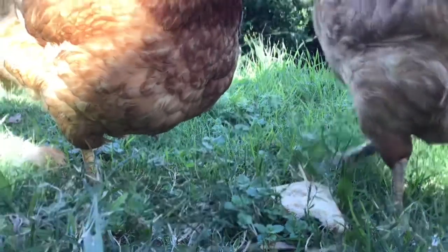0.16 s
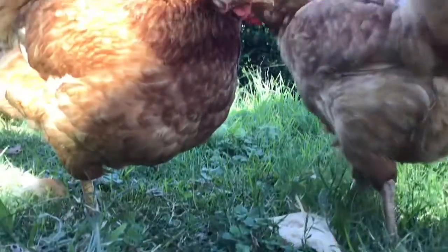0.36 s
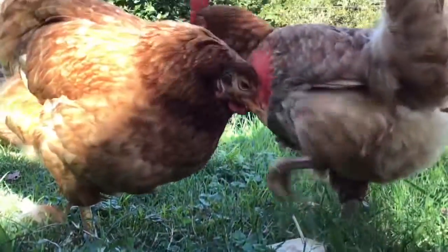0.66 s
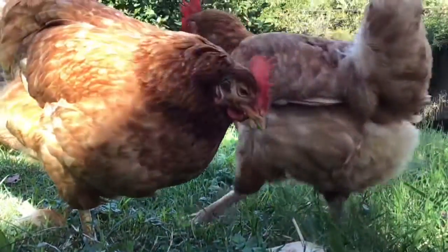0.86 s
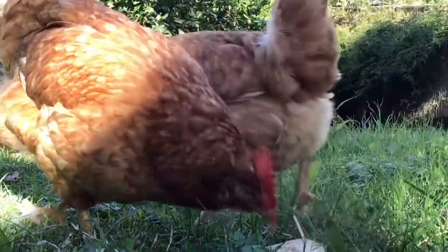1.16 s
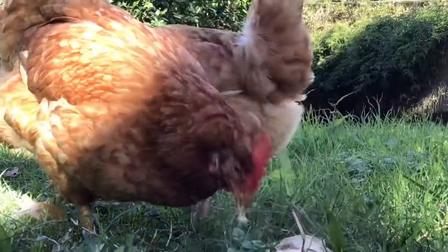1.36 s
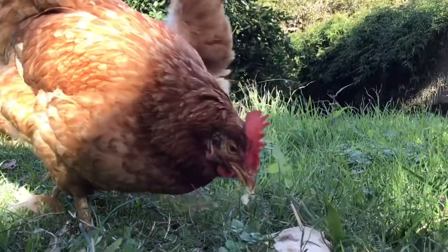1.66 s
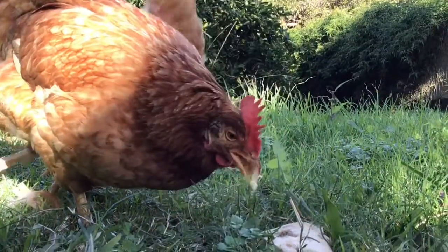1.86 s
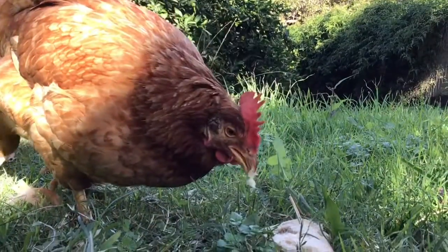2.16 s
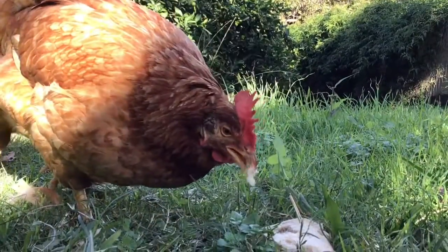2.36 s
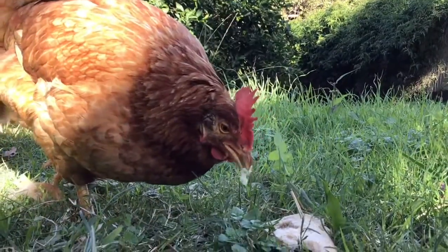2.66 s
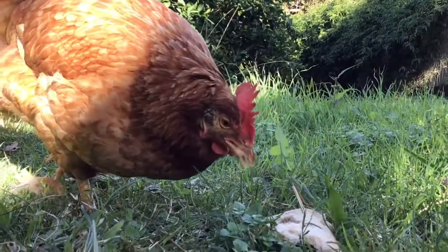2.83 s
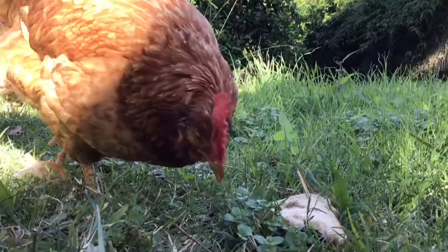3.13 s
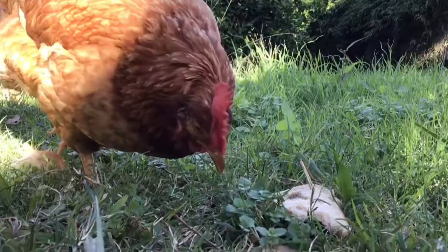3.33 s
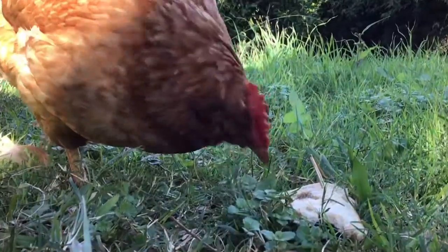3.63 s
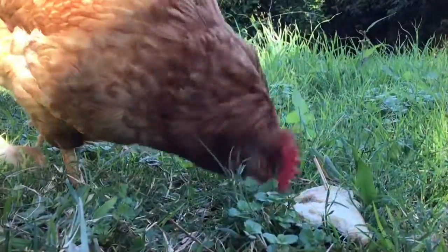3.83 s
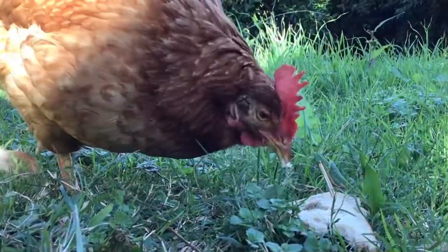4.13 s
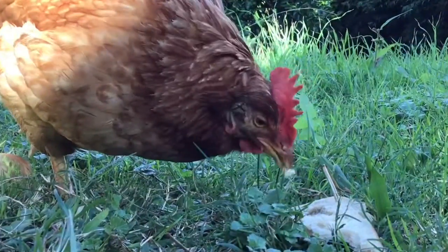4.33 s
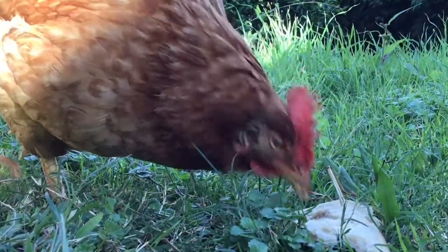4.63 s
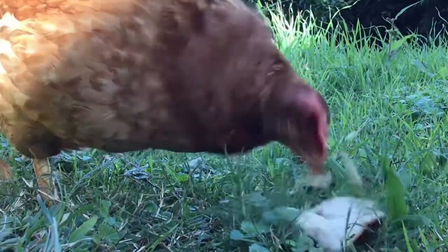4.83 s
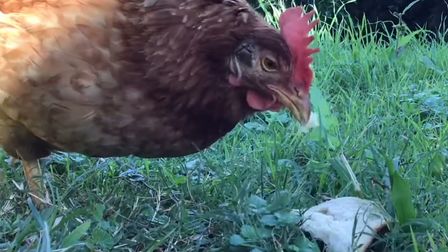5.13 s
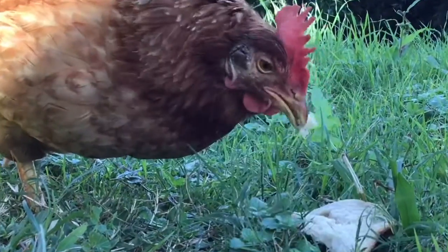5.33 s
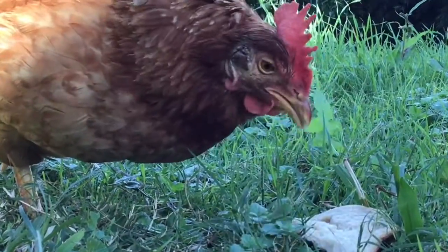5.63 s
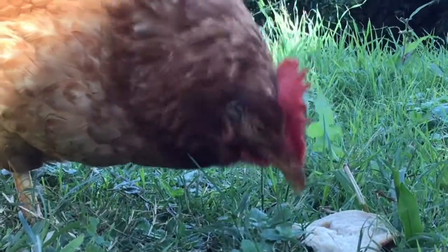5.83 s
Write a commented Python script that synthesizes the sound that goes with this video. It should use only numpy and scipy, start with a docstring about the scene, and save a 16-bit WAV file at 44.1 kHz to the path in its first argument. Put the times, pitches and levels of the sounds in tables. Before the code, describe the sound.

A hand scrapes and loudly knocks the microphone, then hens peck quietly in grass with faint ticks, rustles and distant small birds chirping.

```python
"""A hand slides off the microphone of a recorder held close to hens pecking at bread, and knocks its housing.
Slips of friction make the slide and the later grip creaks; knocks are falling tones, thuds padded swings.
Grass rustles in filtered crackle, and beaks and stalks tick as short ringing bursts.
Small birds chirp in gliding sines with scattered echoes; shaped noise rumbles in the distance."""
import sys
import numpy as np
from scipy import signal
from scipy.fft import rfft, irfft
from scipy.io import wavfile
from scipy.ndimage import uniform_filter1d

SR = 44100
rng = np.random.default_rng(int(sys.argv[2]) if len(sys.argv) > 2 else 0)


def materialize(psi):
    """Save the field psi as 16-bit PCM at rate SR to the path in sys.argv[1].

    A 1-D psi becomes a single channel; in a 2-D psi each row is a channel.
    """
    bounded = np.clip(np.atleast_2d(psi).T, -1, 1)
    quanta = np.round(bounded * 32767).astype(np.int16)
    wavfile.write(sys.argv[1], SR, quanta)


N = 264159


def gain_of(db):
    """Amplitude factor of a level in dB."""
    return 10 ** (np.asarray(db) / 20)


def evened(x):
    """Scales x to rms 1."""
    return x / np.sqrt(np.mean(x ** 2) + 1e-20)


def add(mix, start_s, sound):
    """Adds a sound in place, cut at the end of the mix."""
    part = mix[round(start_s * SR):][:len(sound)]
    part += sound[:len(part)]


def add_each(mix, rows, source):
    """Plays every row of a table: its start, then the settings of the source."""
    for start_s, *settings in rows:
        add(mix, start_s, source(*settings))


def columns(rows):
    """Reads a curve table at every sample; returns the start time and the columns."""
    row_s, *cols = np.transpose(rows)
    t = np.arange(row_s[0], row_s[-1], 1 / SR)
    return row_s[0], [np.interp(t, row_s, col) for col in cols]


def coloured(x, points):
    """Shapes x by a spectrum given on a log-frequency axis, at rms 1."""
    point_hz, point_db = np.transpose(points)
    hz = np.fft.rfftfreq(len(x), 1 / SR)
    db = np.interp(np.log(hz + 1), np.log(point_hz + 1), point_db)
    return evened(irfft(rfft(x) * gain_of(db), len(x)))


def resonate(x, hz, width_hz):
    """Shifts the curve hz down to zero, smooths, and shifts back: a resonance of gain 1."""
    turn = np.exp(2j * np.pi * np.cumsum(hz * np.ones(len(x))) / SR)
    r = np.exp(-np.pi * width_hz / SR)
    return 2 * (turn * signal.lfilter([1 - r], [1, -r], x / turn + 1e-18)).real


def wobble(n, seconds):
    """Slow chance of rms 1: noise averaged twice over the given span."""
    span = max(round(seconds * SR), 2)
    return evened(uniform_filter1d(uniform_filter1d(rng.standard_normal(n), span), span))


def grit(n, per_s, spread_db, hiss):
    """Friction: many tiny slips of uneven size over a smooth hiss."""
    sizes = gain_of(spread_db * np.minimum(rng.exponential(1, n), 4))
    slips = sizes * (rng.random(n) < per_s / SR) * rng.choice([-1., 1.], n)
    return evened(evened(slips) + hiss * rng.standard_normal(n))


# Hand sliding over the microphone. Each row: time in seconds, drag level in dB,
# pitch of the air pocket under the hand in Hz, pocket level in dB.
SLIDE_CURVE = [(0, -33.5, 1500, -79.5), (.03, -34, 1550, -75), (.07, -28.5, 1600, -65.5),
               (.105, -23, 1886, -54), (.14, -24.5, 1981, -52), (.185, -32.5, 2100, -52),
               (.225, -42, 2600, -52), (.25, -53.5, 3522, -55.5), (.33, -67, 5600, -65.5),
               (.4, -70.5, 7600, -71.5), (.5, -72.5, 8800, -78)]
# Spectrum of the drag. Each row: frequency in Hz, relative density in dB per Hz.
SLIDE_SPECTRUM = [(24, -45.5), (40, -10), (97, -14.5), (175, 0), (599, -7), (677, -6), (845, -9.5),
                  (954, -9), (5000, -55), (6500, -86.5), (11000, -120)]


def slide():
    """Skin drags on the housing; the air pocket under the hand rings higher as it opens."""
    start_s, (drag_db, pocket_hz, pocket_db) = columns(SLIDE_CURVE)
    n = len(drag_db)
    drag = coloured(grit(n, 4000, spread_db=4.0, hiss=1.3), SLIDE_SPECTRUM)
    drag *= gain_of(drag_db + 2.4 * wobble(n, 0.0036))
    brush = grit(n, 2000, spread_db=4.0, hiss=0.63)
    under = brush
    for _ in range(5):  # the pocket passes little above its own band
        brush = resonate(brush, pocket_hz, 3700)
        under = resonate(under, .6 * pocket_hz, 5200)  # duller brushing below it
    pocket = evened(brush) + 1.2 * evened(under)
    return start_s, drag + pocket * gain_of(pocket_db + 2.1 * wobble(n, 0.0068))


# Blows on the housing. Each row: start in seconds, peak in dB, rise time constant in ms,
# time scale of the falling tone in ms (about its first period).
KNOCK_ROWS = [(.0105, -21, 0.51, 1.42), (.0735, -26, 1.2, 1.3), (.175, -15, 1, 1.75),
              (.2001, -3, 0.1, 1.18), (.2064, -5, 0.13, 1.2), (.3065, -45.5, 0.2, 1.2626)]


def knock(peak_db, rise_ms, period_ms):
    """Bending waves in the housing: the treble arrives first, so the tone sweeps down."""
    ms = np.arange(0, .08, 1 / SR) * 1000
    turns = 1.02 * np.log(1 + ms / period_ms) + 0.15
    rise = (1 - np.exp(-ms / max(rise_ms, .05))) ** 2
    fade = np.exp(-ms / (4.9 * period_ms)) + .06 * np.exp(-ms / 14)
    wave = rise * fade * np.sin(2 * np.pi * turns)
    return gain_of(peak_db) * wave / abs(wave).max()


# Fingers shifting on the housing. Each row: start in seconds, length in seconds, level in dB.
GRIP_SPELLS = [(2.845, 0.05873, -60.5), (2.96, 0.3355, -61), (3.3, 0.20107, -57.5), (3.78, 0.20274, -65),
               (5.79, 0.08972, -62)]
# Spectrum of the grip. Each row: frequency in Hz, relative density in dB per Hz.
GRIP_SPECTRUM = [(29, -66.5), (50, -18), (123, 2.5), (157, -8.5), (381, -12), (675, -18), (1020, -35.5),
                 (2500, -44), (3250, -86), (5500, -120)]
GRIP_EASE = 0.2758  # share of a spell spent swelling and fading


def grip(length_s, level_db):
    """Dull uneven slips carried through the housing."""
    n = round(length_s * SR)
    slips = coloured(grit(n, 250, spread_db=2.5, hiss=.6), GRIP_SPECTRUM)
    return slips * gain_of(level_db) * signal.windows.tukey(n, GRIP_EASE)


# Soft thuds through the grip. Each row: start in seconds, peak in dB.
THUD_ROWS = [(2.419, -60), (2.998, -48.5), (3.111, -43), (3.153, -44), (3.203, -46.5), (3.239, -46.5),
             (3.324, -44.5), (3.374, -48.5), (3.384, -51.5), (3.413, -49.5), (3.439, -50.5), (3.477, -47.5),
             (3.815, -46), (3.874, -53), (3.913, -52.5), (3.97, -49.5), (5.809, -49.5), (5.875, -56.5)]
SWING_MS = 3.6024  # period at the peak


def thud(peak_db):
    """A padded push: about two swings under a rounded outline, slowing as they go."""
    turns = np.arange(0, 5 * SWING_MS, 1000 / SR) / SWING_MS - 1.4
    slowed = turns - 0.318 * turns * np.minimum(abs(turns), 2) * np.sign(turns)
    outline = np.exp(-(turns / np.where(turns < 0, .6, 1.2)) ** 2)
    return -gain_of(peak_db) * outline * np.cos(2 * np.pi * slowed)


# Low boom. Each row: start in seconds, length in seconds, pitch in Hz, peak in dB.
BOOM_ROWS = [(3.722, 0.08139, 113, -49)]


def boom(length_s, hz, peak_db):
    """A short swell on one low note."""
    t = np.arange(0, length_s, 1 / SR)
    return gain_of(peak_db) * np.sin(np.pi * t / length_s) * np.sin(2 * np.pi * hz * t)


# Beak taps and snapping stalks; the first row, at 0.104 s, is a tick of the hand sliding over the microphone.
# Each row: start in seconds, peak of the snap in dB, # centre of the snap in Hz, low tap relative to the snap
# in dB.
TICK_ROWS = [(0.1037, -35.5, 3640, -9), (0.1523, -44, 3020, -22.5), (0.1748, -46.5, 4500, -9.5),
             (0.3707, -62.5, 2497, 1), (0.4247, -65, 2500, 9.5), (0.529, -52, 8640, -21),
             (.5464, -52.5, 9357, -7.5), (1.1318, -57, 9210, -20.5), (1.1623, -54.5, 9090, -12.5),
             (1.3118, -46.5, 7100, -16), (1.5925, -52.5, 8000, -21.5), (1.717, -55, 8800, -24),
             (2.8569, -49.5, 5500, -6), (2.8607, -49.5, 5103, 5), (2.865, -54, 5390, -3),
             (2.9748, -52, 8297, -21), (2.9833, -49.5, 8265, -20.5), (2.9904, -51.5, 5700, -3.5),
             (3.0514, -55.5, 6340, -20), (3.136, -49, 4035, 3.5), (3.1645, -52.5, 7997, -5.5),
             (3.1791, -57, 7060, 1.5), (3.2397, -65.5, 2161, -7.5), (3.4011, -49, 5360, -4),
             (3.4181, -51.5, 4350, -18), (3.4384, -51, 6154, -10), (3.4874, -54, 7987, -2),
             (3.896, -55, 6520, -10), (4.1155, -48.5, 6000, -15.5), (4.2029, -52.5, 6435, -25.5),
             (4.2944, -57.5, 6142, -19), (4.4047, -51, 6200, -23), (4.4972, -59.5, 4710, -18),
             (4.6225, -57.5, 6681, -23.5), (4.8514, -50, 6345, -20), (5.0425, -55, 5870, 0.5),
             (5.0671, -54.5, 6196, -24.5), (5.5022, -59, 3960, -25), (5.5286, -54.5, 2990, -22.5),
             (5.5284, -56, 5700, -31), (5.5563, -53, 2930, -30.5), (5.5569, -60, 5530, -29.5),
             (5.7995, -66.5, 1794, -3), (5.8107, -64.5, 2224, 4), (5.8365, -59, 5200, -12),
             (5.8701, -58, 2820, -17), (5.896, -55, 2701, -20.5), (5.9219, -61.5, 2801, -19)]


def tick(peak_db, hz, low_db):
    """A short burst rings the band of a beak or stalk, with a duller tap beneath."""
    noise = rng.standard_normal(800)
    ms = np.arange(len(noise)) / SR * 1000
    burst = noise * np.exp(-ms / 0.706) + 0.06018 * noise[::-1] * np.exp(-ms / 4.5)
    snap = burst
    for _ in range(3):
        snap = resonate(snap, hz, .8 * hz)
    tap = resonate(burst, 1300, 1500)
    return gain_of(peak_db) * (snap / abs(snap).max() + gain_of(low_db) * tap / abs(tap).max())


# Feet and feathers sweeping through blades; the row at 1.385 s is instead a breathy burst within the bird's
# chirp there. Each row: start in seconds, length in seconds, # level in dB, centre of the bright band in Hz.
SWISH_ROWS = [(.5, 0.1105, -71, 9500), (.75, 0.22, -80, 10000), (1.12, 0.20425, -72, 8000),
              (1.385, 0.044, -74, 3800), (1.44, 0.11, -79.5, 9064), (2.46, 0.22974, -82.5, 6960),
              (2.848, 0.02245, -81, 2203), (2.96, 0.11785, -72.5, 7400), (3.13, 0.0565, -79.5, 6933),
              (3.33, 0.126, -78.5, 6490), (3.81, 0.08533, -74.5, 7300), (4.54, 0.07118, -78.5, 6772),
              (4.67, 0.23045, -70, 6408), (5.06, 0.14892, -74.5, 6884), (5.55, 0.10934, -75.5, 5105),
              (5.78, 0.06081, -77.5, 4800), (5.89, 0.11597, -71, 5868)]
# Spectrum of grass blades, also for the rustle. Each row: frequency in Hz, relative density in dB per Hz.
BLADE_SPECTRUM = [(530, -41.5), (900, -5.5), (2050, -6.5), (2550, -5.5), (3120, -7.5), (6180, -3),
                  (7660, -6.5), (15700, -29.5)]


def swish(length_s, level_db, bright_hz):
    """Dense crackle with a bright band over a wide spread, swelling and fading."""
    n = round(length_s * SR)
    blades = grit(n, 2500, spread_db=1.5, hiss=0.81)
    width_hz = 0.609 * bright_hz
    band = evened(resonate(resonate(blades, bright_hz, width_hz), bright_hz, width_hz))
    crackle = evened(band + 0.4816 * coloured(blades, BLADE_SPECTRUM))
    return crackle * gain_of(level_db + 1.9 * wobble(n, 0.0091)) * signal.windows.tukey(n, .6)


# Grass at rest. Each row: time in seconds, faint stir of blades in dB, thin high hiss in dB.
RUSTLE_CURVE = [(.35, -73, -81), (.85, -82, -77.5), (1.2, -77, -74), (1.4, -87, -82), (1.72, -78.5, -73),
                (2.3, -87.5, -87.5), (2.6, -83.5, -83), (3.0, -78, -85), (4.4, -82, -89.5), (4.8, -75, -84),
                (5.3, -84.5, -96), (5.99, -79, -92)]


def rustle():
    """A faint crackle of blades, and a narrow hiss high above it."""
    start_s, (blades_db, hiss_db) = columns(RUSTLE_CURVE)
    n = len(blades_db)
    blades = coloured(grit(n, 1500, spread_db=4.0, hiss=1.1804), BLADE_SPECTRUM)
    blades *= gain_of(blades_db + 1.7884 * wobble(n, 0.00919))
    hiss = resonate(resonate(grit(n, 2500, spread_db=3.0, hiss=0.56), 8837.2, 1798), 8837.2, 1798)
    air = resonate(resonate(rng.standard_normal(n), 12500, 5000), 12500, 5000)  # a fainter shelf above
    hiss = evened(evened(hiss) + 0.39 * evened(air))
    hiss *= gain_of(hiss_db + 1.4 * wobble(n, 0.042))
    return start_s, (blades + hiss) * signal.windows.tukey(n, .02)


def shares(length_s):
    """Runs from 0 to 1 over a call."""
    return np.linspace(0, 1, round(length_s * SR))


def chirp(hz, warble, *levels_db):
    """A whistled glide, with an octave overtone where one is given; pitch and strength flutter."""
    hz = uniform_filter1d(hz, 150) * (1 + warble * wobble(len(hz), 0.0017))
    flutter = gain_of(2.2 * wobble(len(hz), .003))
    phase = 2 * np.pi * np.cumsum(hz) / SR
    tone = sum(gain_of(db) * np.sin((k + 1) * phase) for k, db in enumerate(levels_db))
    return np.sqrt(2) * tone * flutter * signal.windows.tukey(len(hz), .2)


# Long upward sweeps. Each row: start in seconds, length in seconds, from Hz, to Hz,
# lateness of the climb as an exponent, peak in dB.
SWEEP_ROWS = [(4.14, 0.060386, 2400, 6011, 1.0512, -63), (4.314, 0.09671, 2004, 5969, 1.1423, -64),
              (4.498, 0.08691, 2390, 5091, 1.6, -68.5)]
SWEEP_PEAK_AT, SWEEP_FROM_DB, SWEEP_END_DB = 0.6186, -30, -2  # share of the call; dB below its peak
SWEEP_WARBLE = .015  # rms share of the pitch


def sweep(length_s, from_hz, to_hz, late, peak_db):
    """Starts low and soft, climbs ever faster and is loudest past midway."""
    u = shares(length_s)
    swell_db = np.interp(u, [0, SWEEP_PEAK_AT, 1], [SWEEP_FROM_DB, 0, SWEEP_END_DB])
    return chirp(from_hz * (to_hz / from_hz) ** u ** late, SWEEP_WARBLE, peak_db + swell_db)


# Hooked chirps. Each row: start in seconds, length in seconds, low Hz, high Hz,
# middle of the jump in seconds, time scale of the jump in seconds, peak in dB.
HOOK_ROWS = [(1.387, .043, 3299, 3950, 0.0082, 0.005457, -75),
             (2.75, 0.0285, 2891, 4530, 0.008856, 0.004025, -66),
             (2.848, .075, 2580, 4297, 0.03049, 0.007914, -64),
             (3.003, 0.023, 3363, 4429, .014, 0.013, -64),
             (3.098, 0.0879, 2590, 3999, 0.03351, 0.00625, -63.5)]
LEAD_DB, HOLD_DB_PER_S, LEAD_DIP_HZ_PER_S = -12, -450, 8900
HOOK_WARBLE = .018  # rms share of the pitch


def hook(length_s, low_hz, high_hz, jump_at_s, jump_s, peak_db):
    """A soft lead-in slips to its low note; pitch and strength jump, then the high note fades."""
    t = shares(length_s) * length_s - jump_at_s
    up = .5 + .5 * np.tanh(t / jump_s)
    fade_db = HOLD_DB_PER_S * np.maximum(t - jump_s, 0)
    lead_hz = low_hz + LEAD_DIP_HZ_PER_S * np.maximum(-t - 1.498 * jump_s, 0)
    hz = lead_hz + (high_hz - lead_hz) * up
    return chirp(hz, HOOK_WARBLE, peak_db + LEAD_DB * (1 - up) + fade_db)


# Peeps with an overtone. Each row: start in seconds, length in seconds, from Hz, middle Hz, to Hz,
# share where the final bend begins, share scaling its duration, start level in dB,
# swell over the call in dB, octave relative to the start level in dB.
PEEP_ROWS = [(.503, 0.081, 2845, 3315, 1745, 0.772, 0.10087, -72.5, 16, -1.5),
             (1.524, 0.05646, 3350, 3100, 2155, 0.4626, 0.4047, -83.5, 6.5, 2),
             (2.988, 0.03806, 2614, 2980, 3170, 0.2947, 0.4796, -71.5, -0.5, -0.5),
             (3.022, 0.052, 2430, 2540, 2218, 0.41, .4, -79, 0.5, -1.5),
             (4.265, .047, 2235, 2457, 2260, 0.4617, 0.409, -86, -5, 0),
             (4.715, .265, 2273, 2629, 1917, 0.26, .6, -76, 0.5, -15),
             (4.978, 0.06935, 1800, 1750, 1747, 0.4096, 0.415, -89, -0.5, 5.5),
             (5.335, 0.06457, 2230, 2220, 1802, .65, 0.3015, -99.5, 13.5, 10)]
SCOOP_END, SAG, BEND_DB = .27, .14, -15.5  # share of the peep; steady share of the bend; fade with the bend
PEEP_WARBLE = .006  # rms share of the pitch


def peep(length_s, from_hz, mid_hz, to_hz, knee, drop, level_db, swell_db, octave_db):
    """Scoops to its middle pitch, drifts, then bends and weakens; an octave overtone rides along."""
    u = shares(length_s)
    scoop = np.maximum(1 - u / SCOOP_END, 0) ** 2
    after = np.maximum(u - SCOOP_END, 0) / (1 - SCOOP_END)
    bend = SAG * after + (1 - SAG) * (1 - np.exp(-(np.maximum(u - knee, 0) / drop) ** 2))
    hz = mid_hz + (from_hz - mid_hz) * scoop + (to_hz - mid_hz) * bend
    faded_db = level_db + BEND_DB * bend
    return chirp(hz, PEEP_WARBLE, faded_db + swell_db * u, faded_db + octave_db)


# Plain whistles. Each row: start in seconds, length in seconds, from Hz, to Hz,
# start level in dB, warble as an rms share of the pitch.
WHISTLE_ROWS = [(2.33, 0.07239, 4080, 3890, -80.5, .03), (2.59, 0.07762, 3880, 4420, -68, 0.02086),
                (3.155, .08, 5097, 5030, -72.5, .018), (3.164, 0.06186, 3545, 3386, -68, 0.04024),
                (4.665, 0.0765, 3280, 3605, -76.5, 0.01075), (4.71, 0.0782, 3950, 4150, -76.5, 0.02448),
                (4.8, .09, 3780, 3850, -76, 0.00872), (5.05, 0.025, 1700, 1698, -83.5, .008),
                (5.088, 0.055, 2900, 2300, -77, .012), (5.385, 0.03927, 3750, 2294, -77.5, 0.01552),
                (5.7, 0.04485, 4500, 4510, -85.5, 0.007942), (5.738, .024, 3500, 2700, -76, .015)]
WHISTLE_FADE_DB = -13


def whistle(length_s, from_hz, to_hz, level_db, warble):
    """A straight glide that fades."""
    u = shares(length_s)
    return chirp(from_hz + (to_hz - from_hz) * u, warble, level_db + WHISTLE_FADE_DB * u)


def hedges(x):
    """Scattered echoes from bushes and ground: sparse taps of random sign that die away."""
    fade = gain_of(-60 * np.arange(9000) / SR / 0.1015)
    taps = rng.choice([-1., 1.], 9000) * (rng.random(9000) < .05) * fade
    taps[:150] = 0
    return signal.fftconvolve(x, taps / np.linalg.norm(taps))[:N]


# Spectrum of the yard. Each row: frequency in Hz, relative density in dB per Hz.
YARD_SPECTRUM = [(15, -56), (25, -25), (45, -5.5), (70, 10.5), (102, 1), (126, 4), (268, -3), (402, -10.5),
                 (707, -15), (1120, -27.5), (2800, -32.5), (3290, -27.5), (4080, -28.5), (8910, -44.5),
                 (15700, -48)]
YARD_DB = -64.5


def yard():
    """Distant rumble and air, gently lumpy."""
    return gain_of(YARD_DB + wobble(N, .03)) * coloured(rng.standard_normal(N), YARD_SPECTRUM)


def scene():
    """Sums handling, grass and yard with the birds and their echoes."""
    near, birds = yard(), np.zeros(N)
    add(near, *slide())
    add_each(near, KNOCK_ROWS, knock)
    add_each(near, GRIP_SPELLS, grip)
    add_each(near, THUD_ROWS, thud)
    add_each(near, BOOM_ROWS, boom)
    add_each(near, TICK_ROWS, tick)
    add_each(near, SWISH_ROWS, swish)
    add(near, *rustle())
    add_each(birds, SWEEP_ROWS, sweep)
    add_each(birds, HOOK_ROWS, hook)
    add_each(birds, PEEP_ROWS, peep)
    add_each(birds, WHISTLE_ROWS, whistle)
    return (near + birds + gain_of(-7.5) * hedges(birds))[None]


EDGE_HZ = 15750


def record(dry):
    """The microphone drops the deepest bass; then the band limit."""
    thin = signal.sosfilt(signal.butter(2, 35, "high", fs=SR, output="sos"), dry)
    lowpass = signal.firwin(511, EDGE_HZ, window=("kaiser", 9), fs=SR)
    return signal.oaconvolve(thin, lowpass[None], "same")


dry = scene()
out = record(dry)
materialize(out)
```